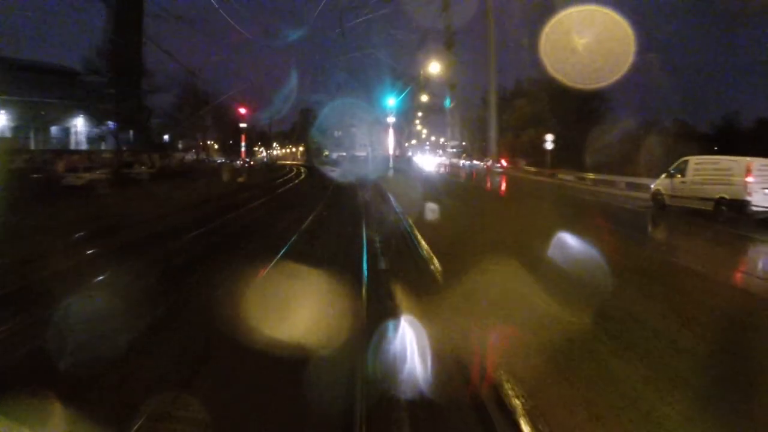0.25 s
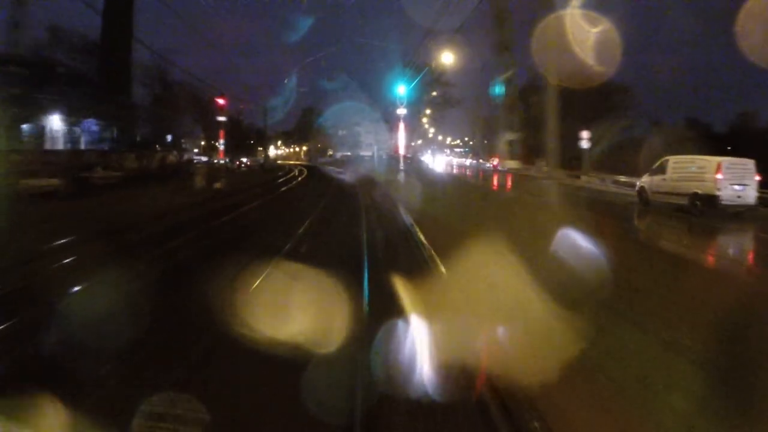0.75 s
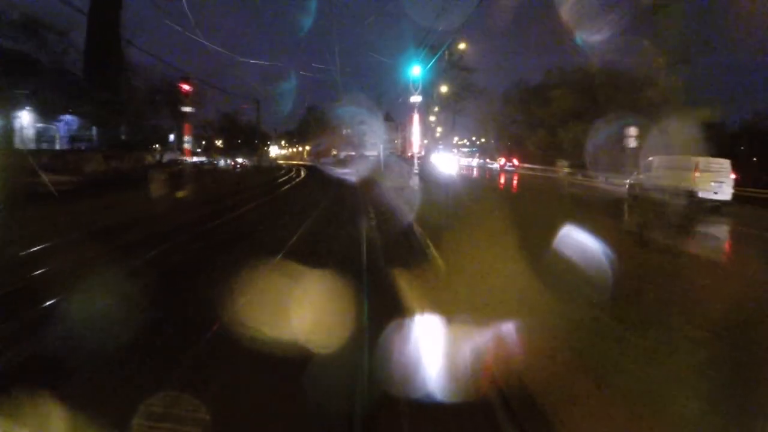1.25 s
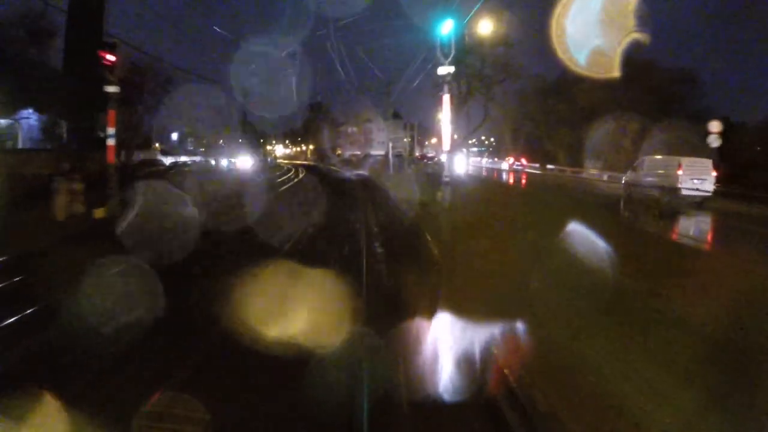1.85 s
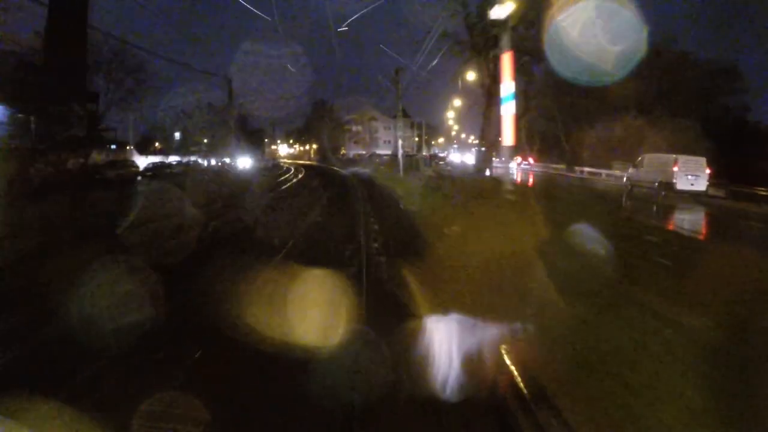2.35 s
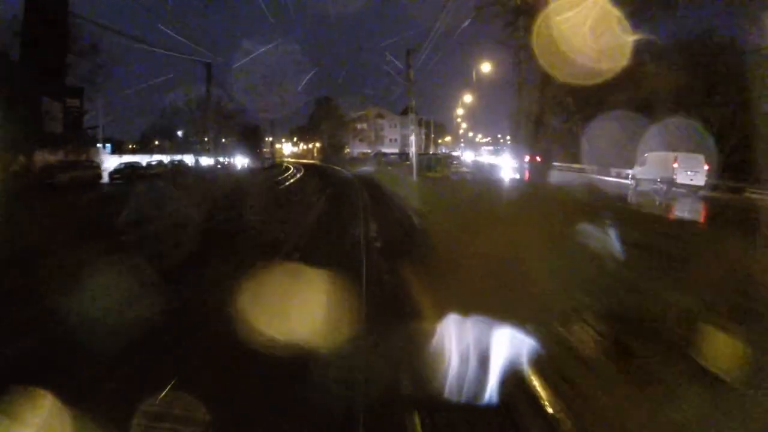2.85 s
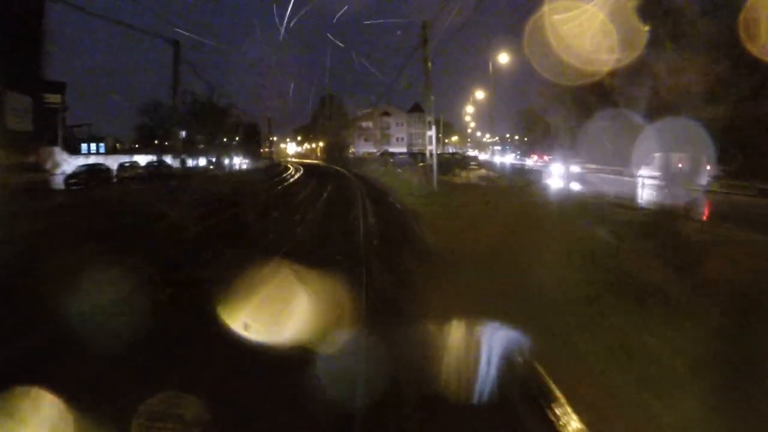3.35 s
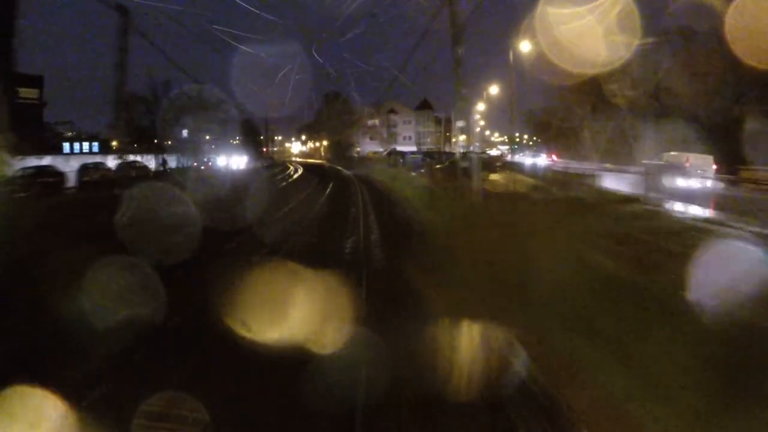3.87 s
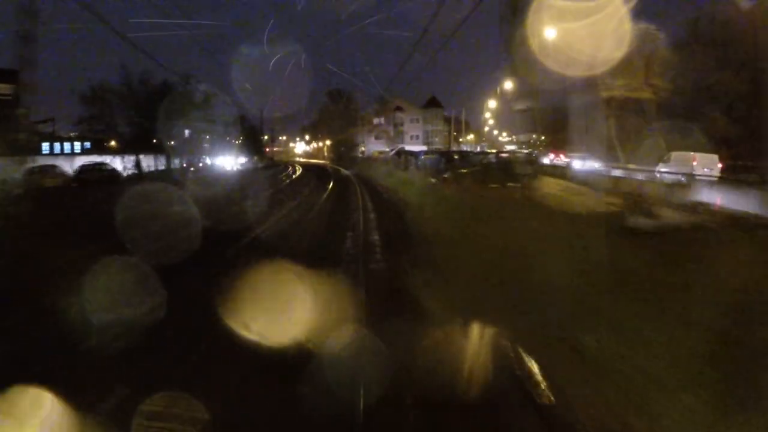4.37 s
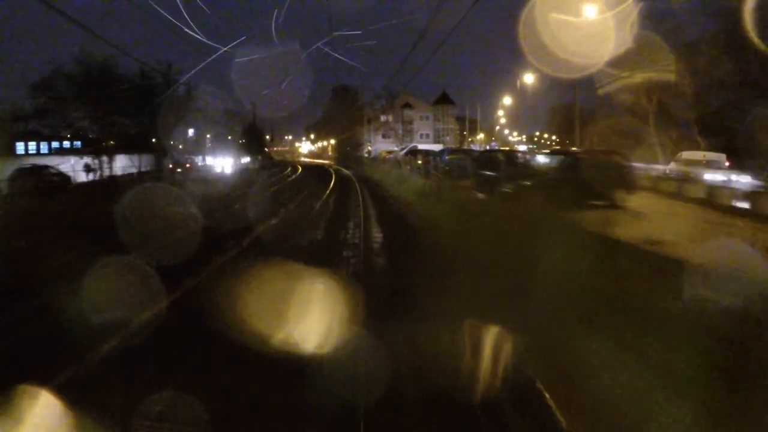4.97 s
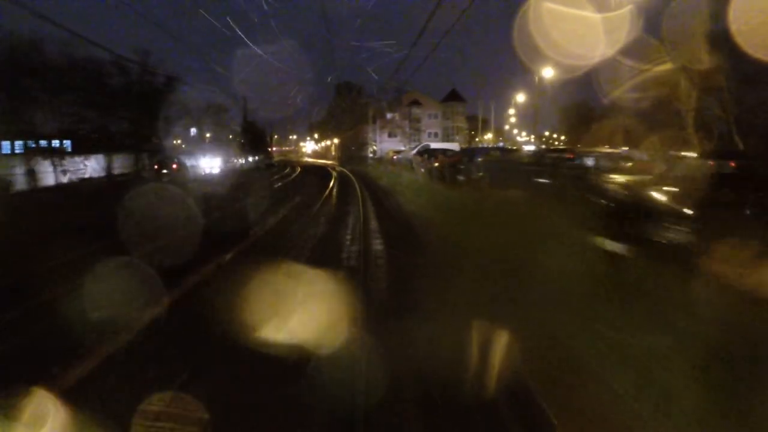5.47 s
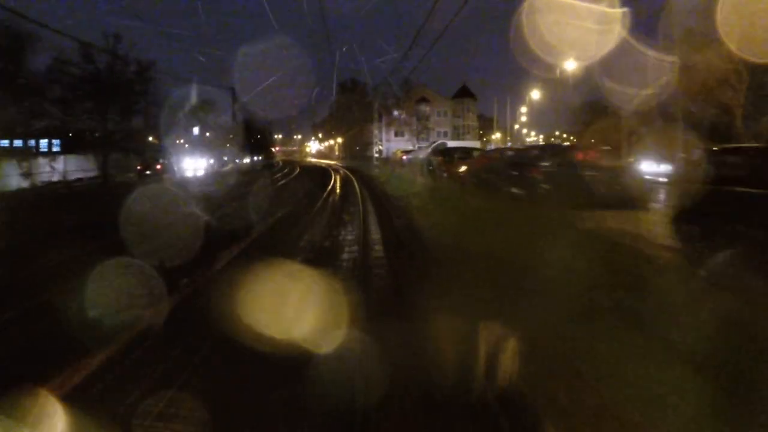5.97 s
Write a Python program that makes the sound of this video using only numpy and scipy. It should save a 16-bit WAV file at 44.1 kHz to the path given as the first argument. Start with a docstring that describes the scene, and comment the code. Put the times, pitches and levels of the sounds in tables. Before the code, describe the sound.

Heard from the front cab of an electric train moving steadily through rain: a dominant low, unsteady hum booms in uneven swells, with a softer wheel roar and wet hiss behind it. Crisp raindrops tick irregularly on a hard shell close to the microphone. Heavier drops knock a duller panel near the start, just before the middle and faintly near the end; a tiny water spatter comes late.

```python
"""An electric suburban train rolls steadily through rain, heard at the front of the driver's cab.
From the start the shaken cab booms in one strong low resonance and a few weaker ones, wheels roar and hiss
on wet rails, a motor whines faintly, and raindrops tick on a hard shell close to the microphone.
Heavy drops knock a duller panel at 0.4 s, 2.8 s and, more softly, 5.8 s; at 4.9 s water spatters briefly.
Noise through resonances makes the rolling, wavering sines the booms, and fading sines with noise the drops."""
import sys
import numpy as np
from scipy import signal
from scipy.fft import rfft, irfft, next_fast_len
from scipy.io import wavfile
from scipy.ndimage import map_coordinates

SR = 44100
rng = np.random.default_rng(int(sys.argv[2]) if len(sys.argv) > 2 else 0)


def master_out(mix):
    """Clip the mix to full scale and print it as 16-bit PCM to the path in sys.argv[1]."""
    frames = np.transpose(np.atleast_2d(mix))
    ceiling = np.clip(frames, -1, 1)
    pcm = np.round(ceiling * 32767).astype(np.int16)
    wavfile.write(sys.argv[1], SR, pcm)


N = 273861  # length in samples, about 6.2 s


def amp(db):
    """Turn decibels into a gain."""
    return 10 ** (np.asarray(db) / 20)


def unit(x):
    """Scale x to an average (rms) size of 1."""
    return x / np.sqrt(np.mean(x ** 2) + 1e-20)


def curves(rows):
    """Draw straight lines between table rows: one curve for each column after the time."""
    times_s, *columns = np.transpose(rows)
    return [np.interp(np.arange(N) / SR, times_s, column) for column in columns]


def wobble(rate):
    """A smooth random curve through `rate` random points a second."""
    points = rng.standard_normal(int(N * rate / SR) + 4)
    return map_coordinates(points, [np.arange(N) * rate / SR])


def filtered(x, response):
    """Make each frequency of x louder or softer, as the response function says."""
    padded = next_fast_len(len(x) + 8192)  # room for the filter to ring out
    spectrum = rfft(x, padded) * response(np.fft.rfftfreq(padded, 1 / SR))
    return irfft(spectrum, padded)[:len(x)]


def coloured(points, size=N):
    """Noise of rms 1 whose spectrum joins the (pitch_hz, density_db) points."""
    pitch_hz, density_db = np.transpose(points)

    def response(hz):
        return amp(np.interp(np.log(hz + 1), np.log(pitch_hz), density_db))

    return unit(filtered(rng.standard_normal(size), response))


def resonant(modes, skirt):
    """Noise of rms 1 in separately shaken resonances; a larger skirt darkens the valleys between them."""
    def response(f):
        power = 0
        for centre_hz, width_hz, db in modes:
            offset = (f * f - centre_hz * centre_hz) / ((f + 1) * width_hz)
            power = power + amp(db) ** 2 / (1 + offset ** 2 / skirt) ** skirt
        return np.sqrt(power)

    return unit(filtered(rng.standard_normal(N), response))


def tone(hz):
    """A sine of rms 1 on a moving pitch."""
    return np.sqrt(2) * np.sin(2 * np.pi * np.cumsum(hz) / SR)


def swell(level_db, hz, wander_hz, flutter_db, rate):
    """A sharp resonance under random shaking: nearly a sine, unsteady in pitch and size."""
    flutter = amp(level_db + flutter_db * wobble(rate))
    return flutter * tone(hz + wander_hz * wobble(rate))


def swelling(swells, rest_db, gain_db, attack_s, release_s):
    """Level (dB) of a resonance that idles at rest; each swell builds up, holds and dies away."""
    t = np.arange(N) / SR
    size = np.full(N, amp(rest_db))
    for start, length, db in swells:
        rise = np.clip(.5 + (t - start) / attack_s, 0, 1)
        fall = np.clip(.5 + (start + length - t) / release_s, 0, 1)
        shape = np.sin(np.pi / 2 * rise) * np.sin(np.pi / 2 * fall)
        size = np.maximum(size, amp(db + gain_db) * shape)
    return 20 * np.log10(size)


def add(track, s, sound):
    """Mix a short sound into the track at time s."""
    part = track[max(round(s * SR), 0):][:len(sound)]
    part += sound[:len(part)]


def motor():
    """The traction motor's thin, faint whine: a sine that wavers a little in pitch and level."""
    return swell(level_db=-50, hz=809.6, wander_hz=2.2, flutter_db=2.0, rate=7)


# Resonances of the body panels: pitch_hz, width_hz, level_db (against each other)
BODY_MODES = [(420, 136, -8), (508, 37, -1.5), (537, 14, -7)]
BODY_DB = -38.5  # level at average rolling
BODY_SHARE = 0.55  # dB of shaking in the panels per dB of rolling


def body(effort_db):
    """The body panels hum with the rolling, above the main resonances of the cab's air."""
    return amp(BODY_DB + BODY_SHARE * effort_db) * resonant(BODY_MODES, skirt=1.5)


# Resonances that colour the rolling noise: pitch_hz, width_hz, level_db (against each other)
ROLL_MODES = [(723, 310, -4), (874, 25, -1), (1284, 246, -2.5), (1435, 36, 2), (2073, 230, 1),
              (2407, 154, -0.5), (2984, 430, -2.5), (3380, 220, -8.5)]
# The wheels' main ring: pitch_hz, width_hz, level_db
WHEEL_RING = [(1767, 196, 0)]
# Colour of the spray: pitch_hz, density_db (per Hz, against each other)
SPRAY_COLOUR = [(300, 4.5), (700, 0.5), (2500, -1), (4000, 4), (4400, 4), (4800, 7), (5600, -3), (6300, -5),
                (7000, -13.5), (8200, -7), (9300, -20), (10600, -15), (11400, -34.5), (15000, -43.5)]
ROAR_DB, RING_DB, SPRAY_DB = -1.0, -5, -11.5  # each layer's level over the rolling
RING_FADE_DB_PER_S = 0.67  # the wheels' ring slowly dies down


def rails(rolling_db):
    """Wheels roar on the rails, ring at their main mode and throw up a fine spray."""
    t = np.arange(N) / SR
    level_db = rolling_db + 1.5 * wobble(11)  # rough patches of rail reach all three at once
    fade_db = RING_FADE_DB_PER_S * (t.mean() - t)
    roar = amp(level_db + ROAR_DB) * resonant(ROLL_MODES, skirt=1.64)
    ring_db = level_db + RING_DB + fade_db + 0.97 * wobble(25)
    ring = amp(ring_db) * resonant(WHEEL_RING, skirt=2.3)
    spray = amp(level_db + SPRAY_DB + 1.2 * wobble(24)) * coloured(SPRAY_COLOUR)
    return roar + ring + spray


# Water spattering in a short burst: start_s, level_db, length_s
SPATTERS = [(4.937, -22, .018)]
# Colour of a spatter: pitch_hz, density_db (per Hz, against each other)
SPATTER_COLOUR = [(600, -26), (1400, -2.5), (1750, 1.5), (2300, 2), (2750, -11.5), (3400, -0.5),
                  (4000, -17.5), (6000, -21), (10000, -26), (11500, -45), (15000, -53)]
SPATTER_TAIL_DB, SPATTER_T60_S = -12, 0.31  # fine droplets after a burst: level, time to fall 60 dB


def spatter():
    """A blob of water breaks into many tiny impacts that merge into a brief rasp with a thin tail."""
    bursts = np.zeros(N)
    t = np.arange(SR // 5) / SR
    for s, db, length in SPATTERS:
        burst = np.exp(-(2 * t / length - 1) ** 4)  # a flat-topped bump
        tail = amp(SPATTER_TAIL_DB - 60 * t / SPATTER_T60_S)
        rasp = np.maximum(burst, tail) * coloured(SPATTER_COLOUR, size=len(t))
        add(bursts, s, amp(db) * rasp)
    return bursts


# Heavy drops on the panel: start_s, level_db (before the modes' own levels)
KNOCKS = [(0.382, -11.5), (2.753, -10.5), (5.846, -20)]
# The panel's modes: pitch_hz, level_db (against each other), t60_s (time to fall 60 dB)
PANEL_MODES = [(900, -9, 0.06), (1790, -1, 0.018), (2250, -5, 0.013), (5220, -9, 0.012),
               (6360, -11, 0.0049)]


def panel(attack_s=0.00039, waver=0.0061):
    """Heavy drops ring the wet panel, lower and longer than the shell and slightly unsteady in pitch."""
    knocks = np.zeros(N)
    t = np.arange(SR // 10) / SR
    for s, level_db in KNOCKS:
        ring = np.zeros(len(t))
        for hz, db, t60 in PANEL_MODES:
            unsteady_hz = hz * (1 + waver * wobble(300)[:len(t)])
            ring += amp(db - 60 * t / t60) * tone(unsteady_hz)
        onset = 1 - np.exp(-t / attack_s)
        add(knocks, s, amp(level_db) * ring * onset)
    return knocks


# The shell's modes: pitch_hz, level_db (before the landing place weights them), t60_s (to fall 60 dB)
SHELL_MODES = [(1234, 6.5, 0.013), (1710, -4.5, 0.032), (2245, -1, 0.017), (2960, -4.5, 0.0093),
               (3485, 1.5, 0.0075), (4290, -2.5, 0.0078), (4780, -2.5, 0.011)]
# Colour of a drop's splash: pitch_hz, density_db (per Hz, against each other)
SPLASH_COLOUR = [(500, -32), (2500, -5.5), (5000, 9), (6000, 7), (7400, 6.5), (9600, 4), (10800, -6),
                 (12500, 2), (15000, -13.5)]


def drop(ring_db, ring_hz, splash_db, focus_octaves=0.43, splash_t60_s=0.0061, scatter_db=1.2, lowest_hz=1100):
    """One drop: where it lands decides which shell modes ring; the water bursts in a short splash."""
    t = np.arange(1024) / SR
    ring = np.zeros(len(t))
    for hz, db, t60 in SHELL_MODES:
        # modes near ring_hz sound strongest
        reach = 1 / (1 + (np.log2(hz / ring_hz) / focus_octaves) ** 2)
        detune = 1 + 0.044 * rng.standard_normal()
        strength = reach * amp(db + scatter_db * rng.standard_normal() - 60 * t / t60)
        ring += strength * np.sin(2 * np.pi * (hz * detune * t + rng.random()))
    ring *= 1 - np.exp(-t / 0.00017)  # the soft drop takes a moment to flatten
    fade = amp(-60 * t / splash_t60_s)
    onset = 1 - np.exp(-t / .0001)
    splash = coloured(SPLASH_COLOUR, size=len(t)) * fade * onset
    tick = amp(ring_db - 7.5) * unit(ring) + amp(splash_db - 4.0) * unit(splash)
    highpass = signal.butter(2, lowest_hz, "high", fs=SR)
    return signal.lfilter(*highpass, tick)  # a small, stiff shell radiates no bass


# Loud raindrops: start_s, ring_db, ring_hz (where the ring centres), splash_db
# (both levels compare drop with drop; each drop is then turned down by a fixed amount)
LOUD_DROPS = [(0.06, -29.5, 3700, -47), (0.2361, -24.5, 3320, -39), (0.2455, -18, 3000, -36.5),
              (0.3613, -32.5, 4150.0, -36.5), (0.6589, -23, 3400, -35), (0.706, -28, 3300, -37.6),
              (0.7785, -29, 2950.0, -41.5), (1.0367, -16, 2830, -32.5), (1.21, -24, 3180.0, -39.5),
              (1.3467, -29.5, 3530.0, -39.5), (1.369, -20, 4500, -39.5), (1.487, -21.2, 3580, -30),
              (1.6356, -28.5, 2600, -46.5), (1.888, -30.5, 3130, -39.5), (2.221, -26, 2980.0, -41.5),
              (2.3109, -21, 2940, -35), (2.345, -26, 3560, -36), (2.4785, -20.5, 3600, -32.5),
              (2.8825, -29.5, 2945, -32.5), (3.0643, -18, 4030, -29), (3.1073, -29.5, 3340.0, -41.5),
              (3.1188, -20, 3460, -31), (3.1944, -22.5, 4320, -30), (3.217, -16.5, 3400, -24),
              (3.392, -16.5, 3730, -27.5), (3.6245, -23, 3960, -37), (3.6365, -21, 3170, -35.5),
              (3.6503, -13.5, 3530, -27), (3.67, -25, 3180, -38), (3.6863, -28, 2620.0, -42.5),
              (3.709, -21.5, 3220, -32), (4.0146, -16.5, 3240, -34), (4.0192, -27.5, 3200.0, -34.5),
              (4.22, -18.5, 3520, -33), (4.3483, -24, 2530, -37), (4.5163, -23, 2800, -45),
              (4.623, -28.5, 4257, -36.5), (5.1791, -21, 2280, -34), (5.27, -26.5, 2600, -41),
              (5.5428, -15.5, 3080, -29.5), (5.6347, -21.5, 3170, -38)]
FINE_DROPS = 55
# the smallest fine drops' ring and splash on the same scales, spread of sizes, lowest ring
FINE_RING_DB, FINE_SPLASH_DB, FINE_RANGE_DB, FINE_LOW_HZ = -42.5, -55.5, 9, 2600


def rain():
    """Single loud drops tick on the shell among a random scatter of fine ones."""
    ticks = np.zeros(N)
    for s, ring_db, ring_hz, splash_db in LOUD_DROPS:
        add(ticks, s, drop(ring_db, ring_hz, splash_db))
    for when, size, place in rng.random((FINE_DROPS, 3)):
        size_db = FINE_RANGE_DB * size ** 2  # most are small
        ring_hz = FINE_LOW_HZ * 2 ** place  # anywhere within an octave
        fine = drop(FINE_RING_DB + size_db, ring_hz, FINE_SPLASH_DB + size_db)
        add(ticks, when * N / SR, fine)
    return ticks


# Sway of the car body: pitch_hz, density_db (per Hz, against each other)
RUMBLE_COLOUR = [(20, -20.5), (32, -8.5), (44, -2), (57, -5.5), (70, -3), (85, -4.5), (100, -16.5),
                 (150, -41.5), (300, -83)]
# The weaker cab resonances: pitch_hz, width_hz, level_db (against each other)
CAB_MODES = [(141.4, 30, 4.5), (158, 19, -3), (206.3, 12, 1), (226, 25, -13), (251, 23, -11),
             (305, 37, -14)]
# Swells of the main boom: start_s, length_s, level_db (before a small trim), pitch_hz (at mid-swell)
BOOM_SWELLS = [(0.071, 0.31, -10, 135.2), (0.431, 0.044, -12, 135.2), (0.518, 0.092, -9.5, 138.0),
               (0.685, 0.16, -10, 135.2), (0.97, 0.048, -11.5, 137.9), (1.074, 0.058, -10, 139.2),
               (1.295, 0.24, -9, 135.2), (1.577, 0.065, -9, 133.9), (1.676, 0.18, -8.5, 136.7),
               (2.011, 0.088, -9, 134.0), (2.256, 0.166, -9, 135.5), (2.556, 0.037, -11, 139.2),
               (2.854, 0.06, -11, 137.9), (2.955, 0.08, -11, 136.7), (3.363, 0.052, -11, 134.1),
               (3.678, 0.184, -8.5, 134.3), (3.906, 0.082, -10.5, 138.5), (4.539, 0.045, -9.5, 134.1),
               (4.786, 0.04, -10.5, 139.2), (4.86, 0.05, -11, 139.2), (5.02, 0.028, -11.5, 136.7),
               (5.359, 0.07, -9.5, 136.7), (5.485, 0.052, -10.5, 132.5), (5.59, 0.166, -9, 134.1),
               (5.927, 0.11, -12.5, 139.3)]
# Swells of the deep throb: start_s, length_s, level_db (before a small trim)
THROB_SWELLS = [(0.088, 0.03, -26), (0.411, 0.077, -19), (0.926, 0.046, -24), (1.072, 0.092, -21),
                (1.249, 0.05, -23), (1.866, 0.042, -23), (1.976, 0.044, -24), (2.83, 0.19, -21),
                (3.654, 0.062, -20.5), (3.967, 0.048, -23.5), (4.035, 0.062, -21.5), (4.386, 0.48, -20.5),
                (4.955, 0.068, -20), (5.18, 0.1, -20.5), (5.669, 0.038, -23), (5.927, 0.044, -20),
                (6.034, 0.036, -24)]
# Swells of the upper resonance: start_s, length_s, level_db (before a small trim)
OVERTONE_SWELLS = [(0.182, 0.047, -29.5), (0.53, 0.056, -33), (0.775, 0.056, -30.5), (1.058, 0.039, -29.5),
                   (2.005, 0.058, -27.5), (2.264, 0.035, -32), (2.847, 0.032, -33.5), (3.438, 0.042, -32.5),
                   (3.743, 0.036, -30), (4.04, 0.042, -32), (4.381, 0.04, -31), (5.269, 0.046, -32),
                   (5.863, 0.043, -32.5), (6.126, 0.08, -32)]
BOOM_REST_DB, THROB_REST_DB, OVERTONE_REST_DB = -19.5, -32.0, -43.0  # levels between swells
THROB_HZ, OVERTONE_HZ = 57.4, 314.7
BOOM_WANDER_HZ, BOOM_STEADYING = 4.55, 1.23  # pitch wander at rest; dB less wander per dB of swell
RUMBLE_DB, DRONE_DB = -31.5, -22.5  # levels at average rolling
SHAKE_SHARE = 0.55  # dB of shaking in the cab per dB of rolling


def cab(effort_db):
    """The track shakes the cab: three sharp resonances swell, and a louder boom holds a steadier pitch."""
    swells = np.array(BOOM_SWELLS)
    boom_db = swelling(swells[:, :3], BOOM_REST_DB, gain_db=0.1, attack_s=0.053, release_s=0.051)
    throb_db = swelling(THROB_SWELLS, THROB_REST_DB, gain_db=-0.9, attack_s=0.054, release_s=0.064)
    overtone_db = swelling(OVERTONE_SWELLS, OVERTONE_REST_DB, gain_db=0.4, attack_s=0.062, release_s=0.045)
    # the boom's pitch glides from the middle of one swell to the next
    boom_hz, = curves([(start + length / 2, hz) for start, length, db, hz in swells])
    unsteady_hz = BOOM_WANDER_HZ * amp(BOOM_STEADYING * (BOOM_REST_DB - boom_db))
    boom = swell(boom_db, boom_hz, wander_hz=unsteady_hz, flutter_db=1.18, rate=26)
    throb = swell(throb_db, THROB_HZ, wander_hz=2.5, flutter_db=1.6, rate=16)
    overtone = swell(overtone_db, OVERTONE_HZ, wander_hz=5.5, flutter_db=2.5, rate=24)
    shake_db = SHAKE_SHARE * effort_db
    rumble = amp(RUMBLE_DB + shake_db) * coloured(RUMBLE_COLOUR)
    drone = amp(DRONE_DB + shake_db) * resonant(CAB_MODES, skirt=1.84)
    return boom + throb + overtone + rumble + drone


# How hard the wheels roll on the track: start_s, level_db (before each layer's own level)
ROLLING = [(0.0, -32.5), (0.4, -31.5), (0.62, -34.5), (1.16, -32), (2.11, -33.5), (2.32, -36), (2.65, -36),
           (2.89, -31.5), (3.03, -32.5), (3.2, -34), (3.54, -33.5), (3.7, -37), (3.92, -36.5),
           (4.36, -32.5), (5.5, -35), (5.62, -36), (5.86, -36), (6.21, -33)]


def scene():
    """Train and rain at one microphone; the rolling drives wheels, panels and the cab's rumble and drone."""
    rolling_db, = curves(ROLLING)
    effort_db = rolling_db - rolling_db.mean()
    water = rain() + spatter() + panel()
    train = motor() + body(effort_db) + rails(rolling_db) + cab(effort_db)
    return (water + train)[None]  # one channel


TOP_HZ = 15000  # nothing is kept from here up


def record(dry):
    """Round off the very highest peaks, then cut everything from the band limit up."""
    rounded = dry / (1 + np.abs(dry / .88) ** 10) ** (1 / 10)  # peaks bend towards 0.88 of full scale
    return np.array([filtered(x, lambda hz: hz < TOP_HZ) for x in rounded])


dry = scene()
out = record(dry)
master_out(out)
```